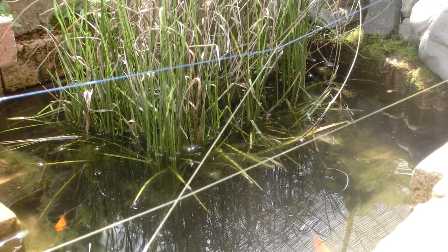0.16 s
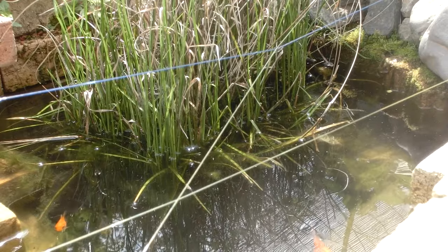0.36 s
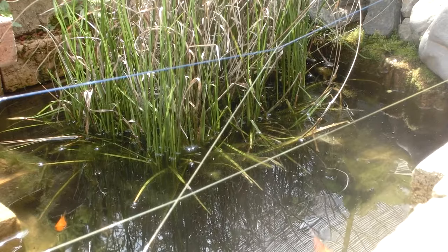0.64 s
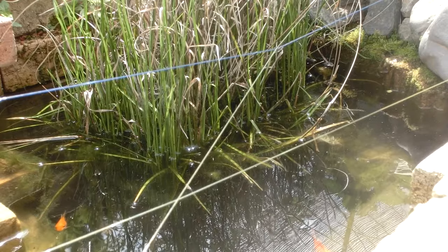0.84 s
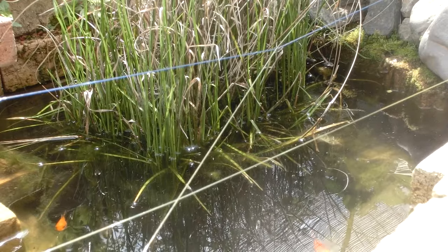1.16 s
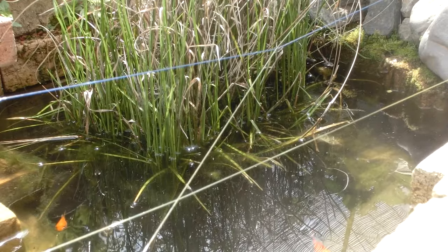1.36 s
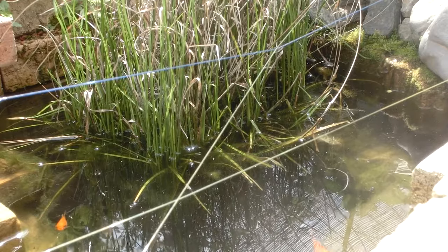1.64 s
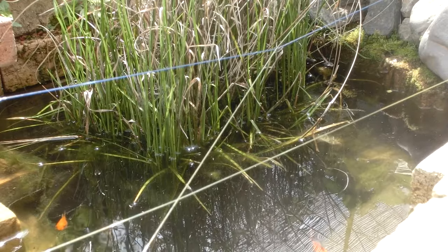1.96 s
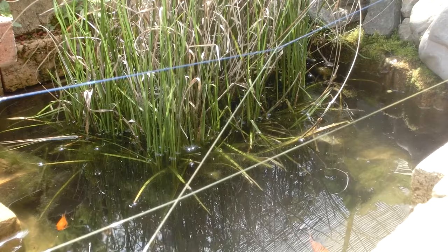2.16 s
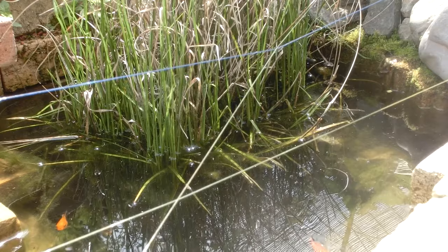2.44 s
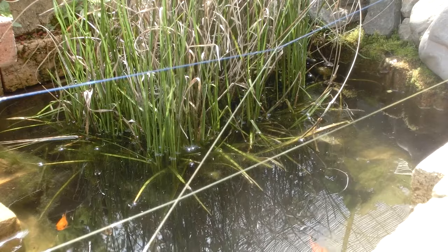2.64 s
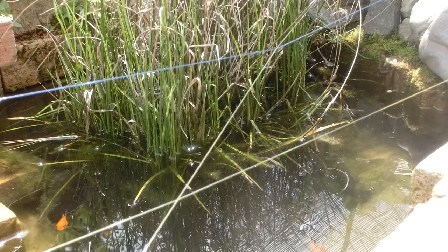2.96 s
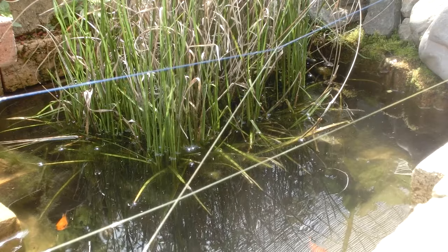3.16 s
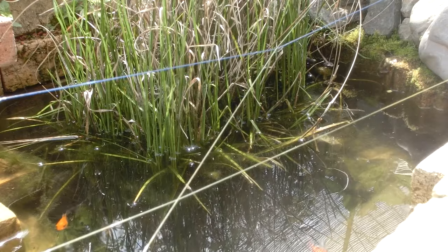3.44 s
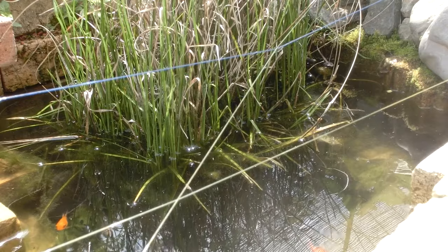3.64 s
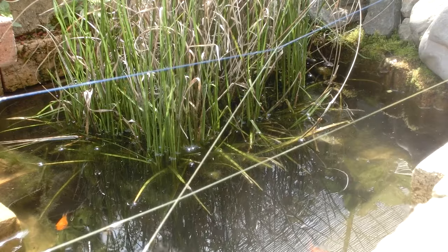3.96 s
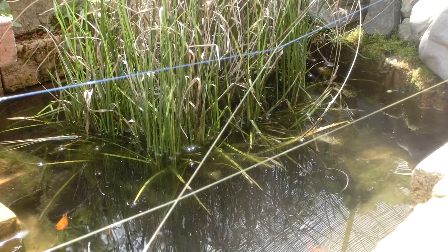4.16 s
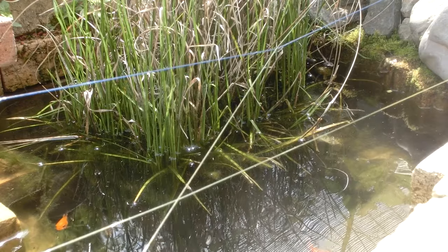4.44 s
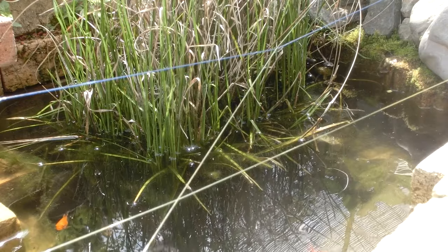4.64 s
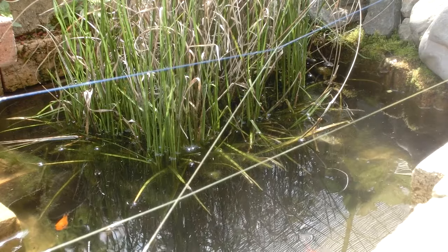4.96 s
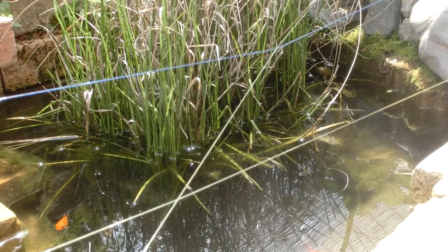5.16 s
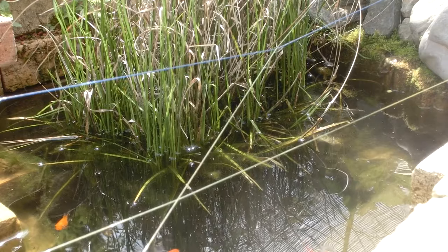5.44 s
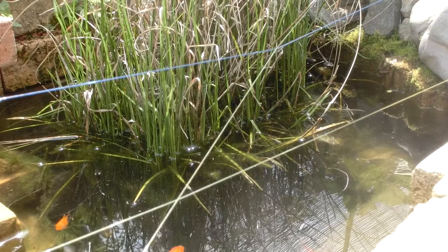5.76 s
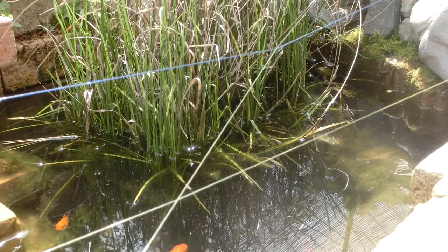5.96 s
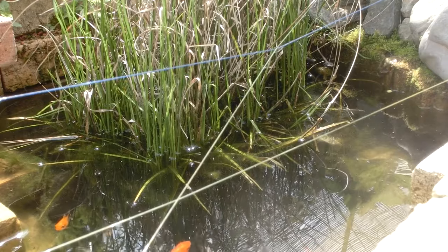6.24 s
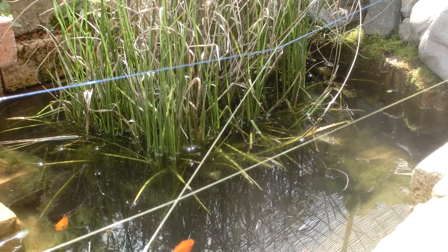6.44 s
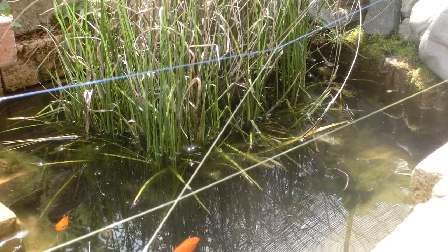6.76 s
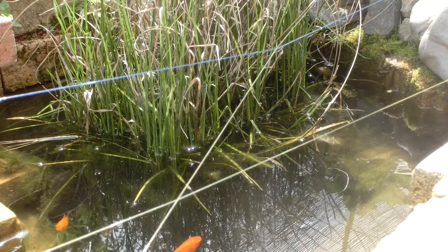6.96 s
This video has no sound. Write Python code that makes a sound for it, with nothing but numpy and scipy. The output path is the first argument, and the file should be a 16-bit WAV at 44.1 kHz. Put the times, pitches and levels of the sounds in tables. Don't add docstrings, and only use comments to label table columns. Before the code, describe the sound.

A frog at a garden pond, a few metres from a stereo microphone pair, croaks seven times. Each croak is a third of a second of rapid hollow clicks, swelling then dropping off. The first two are soft and halting, then after pauses come stronger ones, ending with two loud rolls close together. Beneath lie faint town hum, dull distant traffic bumps and light hiss.

```python
import sys
import numpy as np
from scipy import signal
from scipy.fft import rfft, irfft, next_fast_len
from scipy.io import wavfile
from scipy.ndimage import uniform_filter1d

SR = 44100
rng = np.random.default_rng(int(sys.argv[2]) if len(sys.argv) > 2 else 0)


def convert_level_to_amplitude(level_db):
    exponent = np.asarray(level_db, float) / 20
    return 10 ** exponent


def file_out(sig):
    cols = np.atleast_2d(sig).T
    lim = np.clip(cols, -1, 1)
    pcm = np.round(lim * 32767).astype(np.int16)
    wavfile.write(sys.argv[1], SR, pcm)


N = 313110
LEFT_RIGHT = np.array([[1], [-1]])


def level(x, db):
    return x * convert_level_to_amplitude(db) / np.sqrt(np.mean(x ** 2))


def band_pass(x, low_hz, high_hz):
    return signal.sosfilt(signal.butter(2, [low_hz, high_hz], "band", fs=SR, output="sos"), x)


def walk(rate_hz):
    hold = int(SR / rate_hz)
    steps = np.repeat(rng.standard_normal(N // hold + 1), hold)
    return 1.22 * uniform_filter1d(uniform_filter1d(steps, hold), hold)[:N]


def bands(table, swell_db):
    size = next_fast_len(N)
    octave = np.log2(np.fft.rfftfreq(size, 1 / SR) + 1)
    table_hz, table_db = np.transpose(table)
    noise = rfft(rng.standard_normal(size)) * convert_level_to_amplitude(np.interp(octave, np.log2(table_hz), table_db))
    noise[octave > np.log2(15200)] *= convert_level_to_amplitude(-4)
    noise[(octave > np.log2(15900)) | (octave < 4)] = 0
    out = 0
    for centre in np.arange(4, 14.1, .5):
        centre_hz = 2 ** centre
        window = np.cos(np.pi * np.clip(octave - centre, -.5, .5)) ** 2
        band = irfft(noise * window, size)[:N]
        flicker_db = 1.14 * walk(9) * min(1, 900 / centre_hz)
        out = out + band * convert_level_to_amplitude(swell_db(centre_hz) + flicker_db)
    return out


# pitch_hz [Hz], level_db [dB per Hz]
HUM_SPECTRUM = [(22, -12), (135, -14.5), (270, -4), (660, -3), (1350, -12), (1600, -12), (2390, -19),
                (16000, -28)]
# pitch_hz [Hz], level_db [dB]
HUM_DIFFERENCE = [(60, -4.5), (110, -5), (200, -9), (380, -11), (700, -11.5), (1290, -7.5), (3200, -1.5),
                  (15000, 1.5)]
# time_s [s], level_db [dB]
TOWN_SWELL = [
    (0, 4),
    (1.2, 0.5),
    (2.2, 1),
    (3.4, -0.7),
    (5.45, -2.5),
    (5.9, 1),
    (6.5, -1),
    (7.1, -5),
]


def background():
    hum_db, left_db, drone_share = -54, -1.2, 0.47
    rumble_db = np.interp(np.arange(N) / SR, *np.transpose(TOWN_SWELL))
    side_hz, side_db = np.transpose(HUM_DIFFERENCE)

    def shared_db(hz):
        rumble = rumble_db * (110 < hz < 420)
        return rumble + drone_share * rumble_db * (hz > 420) * min(1, (900 / hz) ** 0.54)

    def different_db(hz):
        return shared_db(hz) + np.interp(np.log(hz), np.log(side_hz), side_db)

    shared = bands(HUM_SPECTRUM, shared_db)
    different = bands(HUM_SPECTRUM, different_db)
    lean = convert_level_to_amplitude(LEFT_RIGHT * left_db / 2)
    return (shared + different * LEFT_RIGHT) * lean * convert_level_to_amplitude(hum_db) / shared.std()


# time_s [s], length_s [s], pitch_hz [Hz], width_hz [Hz], level_db [dB]
TRAFFIC_BUMPS = [
    (0.298, 0.025, 286, 80, -58),
    (.55, 0.11, 326, 90, -58),
    (1.864, 0.024, 306, 100, -52.5),
    (2.255, 0.035, 364, 119, -49.5),
    (2.29, 0.029, 448, 250, -52),
    (2.357, 0.027, 354, 100, -55),
    (4.08, 0.054, 383, 200, -53.5),
    (4.71, 0.051, 272, 80, -57.5),
]


def bumps():
    t, out = np.arange(N) / SR, 0
    for time_s, length_s, hz, width_hz, level_db in TRAFFIC_BUMPS:
        shape = np.exp(-((t - time_s) / length_s) ** 2)
        burst = shape * band_pass(rng.standard_normal(N), hz - width_hz / 2, hz + width_hz / 2)
        out = out + convert_level_to_amplitude(level_db) * burst * np.sqrt(np.sum(shape ** 2) / np.sum(burst ** 2))
    return out


def fading_noise(t60_s, onset, shape=()):
    t = np.arange(SR // 2) / SR
    return rng.standard_normal((*shape, len(t))) * convert_level_to_amplitude(-60 * t / t60_s) * np.clip(onset(t), 0, 1)


# delay_ms [ms], gain [times]
ECHO_PATHS = [(0, -.11), (.099, 1), (1.963, .546), (2.006, -.649), (2.578, .198), (3.402, .13),
              (3.895, -.134), (4.573, -.089), (5.045, .057), (6.1, -.065), (6.374, -.044), (7.276, -.028),
              (8.313, -.047), (10.48, -.02), (11.79, .024), (13.58, -.02), (15.03, .026), (16.27, -.032),
              (18.02, .022), (20.8, -.021), (35.59, .06), (36.55, .058), (37.2, -.035), (43.22, .019)]


def pond(x):
    right_lag_ms, frog_left_db = 0.02, 0.4
    garden_db, garden_side_db, leaves_hz, echo_treble_hz = -12.5, -20, 850, 5000
    stems_db, stems_low_hz = -11.5, 2400
    size = next_fast_len(N + SR)
    hz = np.fft.rfftfreq(size, 1 / SR)
    paths = np.zeros((2, 2, 4096))
    for delay_ms, gain in ECHO_PATHS:
        echo = delay_ms > 1
        right_db = 1 if echo else 1.5
        pulse = np.sinc(np.arange(4096) - 32 - delay_ms * SR / 1000)
        paths[int(echo)] += gain * convert_level_to_amplitude(-LEFT_RIGHT * right_db / 2) * pulse
    direct, echoed = rfft(paths, size)
    near = direct + echoed / (1 + (hz / echo_treble_hz) ** 6)
    lag = np.exp(-2j * np.pi * hz * np.array([[0], [right_lag_ms / 1000]]))
    both = convert_level_to_amplitude(LEFT_RIGHT * frog_left_db / 2) * lag * near

    mid, side = fading_noise(0.36, lambda t: t / 0.0015, (2,))
    spread_db = 10 * np.log10(len(mid))
    tail = level(mid + convert_level_to_amplitude(garden_side_db) * side * LEFT_RIGHT, garden_db - spread_db)
    both = both + rfft(tail, size) / (1 + 1j * hz / leaves_hz)

    stems = level(fading_noise(0.035, lambda t: t / 0.002 - 1), stems_db - spread_db)
    rise = 1j * hz / stems_low_hz
    both = both + rfft(stems, size) * (rise / (1 + rise)) ** 2
    return irfft(rfft(x, size) * both, size)[:, 36:N + 36]


# start_s [s], clicks [count], period_ms [ms], wait_ms after the first click [ms],
# slowing_ms [ms per click squared]
CROAK_RHYTHM = [
    (.0563, 13, 18.04, 8.16, .093),
    (.5109, 15, 20, -8, 0),
    (1.4835, 15, 18.97, 6.27, .009),
    (2.9127, 16, 18.42, 6.78, .021),
    (3.7288, 17, 18.01, 10.5, .044),
    (5.6075, 18, 17.83, 10.03, .034),
    (6.175, 20, 17.85, 6.79, .045),
]
# croak [number],
# click [number], delay_ms [ms]
CORD_CATCHES = [(0, 9, .2), (0, 10, 1.7), (0, 11, 3.3), (1, 6, 2.5), (1, 7, -1.9), (1, 8, 14.4),
                (1, 9, 5.2), (1, 10, -2), (1, 12, 10), (1, 13, 7.5), (1, 14, 2.1), (2, 13, 15.6),
                (2, 14, 7.5), (4, 4, 16.2), (4, 5, 2.2), (4, 6, 4), (4, 7, -4.6), (4, 15, 1), (4, 16, -1),
                (5, 5, .4), (5, 11, -1.1), (5, 15, .9), (6, 7, .5), (6, 12, -.5), (6, 19, 2.2)]


def click_times_ms(croak, slack):
    _, count, period_ms, wait_ms, slowing_ms = CROAK_RHYTHM[croak]
    k = np.arange(count)
    caught_ms = sum(delay * (k >= click) for which, click, delay in CORD_CATCHES if which == croak)
    return period_ms * k + wait_ms * (k > 0) + slowing_ms * k ** 2 + 1.6 * slack + caught_ms


SLACK_CLICKS = [
    (9, 11),
    (1, 3, 5, 6, 9, 11, 12),
    (4, 6, 8, 9, 11, 13),
    (3, 6, 8, 13),
    (6, 8, 10),
    (4, 5, 7, 13),
    (3, 5, 7, 9),
]
TAUT_CLICKS = [
    (10,),
    (7, 10, 13),
    (5, 10),
    (5, 9, 12),
    (3, 4, 9, 14),
    (6, 11),
    (4, 11, 14),
]
# half_swollen_s [s], swell_ms [ms], peak_db [dB], last_click_drop_db [dB],
# sac_stretch [%]
CROAK_EFFORT = [
    (.234, 30, -15.5, 3, 7.9),
    (.732, 72, -14.5, 2.5, 2.3),
    (1.591, 23.5, -12.5, 8, 7.1),
    (3.011, 22.5, -10.5, 3.5, 9.3),
    (3.854, 31.6, -8.5, 5.5, 8.2),
    (5.721, 26, -8, 5, 7.4),
    (6.27, 22.4, -8.5, 7, 4.8),
]
# last_pitch_hz [Hz], top_ring_sinks_s [s], overtone_db [dB], treble_db [dB]
CROAK_COLOUR = [(1480, .4, 3, -1), (1440, .9, 2, -0.5), (1440, 1.8, 2.5, -1), (1570, 3.17, 2.7, -.5),
                (1470, 3.952, 2.5, 1.9), (1530, 5.74, 3, 0.1), (1480, 6.32, 2.5, 2)]


def clicks():
    first_db, usual_gap_ms = -35.5, 18.1
    rest_hz, empty_hz, emptying_s = 1785, 1708, 0.12
    weak_overtone_db, weak_treble_db = 6.5, -5.5
    top_high_hz, top_low_hz = 9970, 9020
    rows = []
    for croak, (start_s, count, *_) in enumerate(CROAK_RHYTHM):
        half_s, swell_ms, peak_db, drop_db, stretch = CROAK_EFFORT[croak]
        last_hz, sinks_s, croak_over_db, croak_treble_db = CROAK_COLOUR[croak]
        k = np.arange(count)
        slack, taut = np.isin(k, SLACK_CLICKS[croak]), np.isin(k, TAUT_CLICKS[croak])
        last = k == count - 1
        ms = click_times_ms(croak, slack)
        s = start_s + ms / 1000
        left_s = s[-1] - s
        effort = 1 / (1 + np.exp((half_s - s) * 1000 / swell_ms))
        full = np.minimum(left_s / emptying_s, 1)

        gap_ms = np.diff(ms, append=ms[-1] + usual_gap_ms)
        hurry = np.clip(usual_gap_ms - gap_ms, -3, 6) * (k > 0)
        tired_db = np.where(last, drop_db, 7.5 * np.exp(-left_s * 1000 / 25))
        db = peak_db + 20 * np.log10(effort + 0.029) - tired_db
        reserve_db = np.minimum(-3 - db, 11.5)
        db = db + reserve_db * (0.12 * taut - 0.16 * slack - 0.051 * hurry)
        db[0] = first_db

        filled = np.sqrt(effort)
        hz = (1 - filled) * rest_hz + filled * empty_hz * (1 + stretch / 100 * full)
        hz = hz + 25 * slack - 14 * taut
        hz = hz - 110 * slack * (k == count - 2)
        hz = np.where(last, last_hz, hz)

        over_db = croak_over_db - 3 * taut + weak_overtone_db - 19 * convert_level_to_amplitude(db)
        over_db = over_db + effort * (2 * slack + 0.17 * hurry - 5 * (1 - full))
        over_db = np.where(last, 6, over_db)
        treble_db = croak_treble_db + (1 - effort) * weak_treble_db
        treble_db = treble_db + effort * (full - 4 * (1 - full) - slack)
        top_hz = top_low_hz + (top_high_hz - top_low_hz) / (1 + np.exp((s - sinks_s) * 1000 / 12))
        rows.append([s, db, hz, over_db, treble_db, top_hz])
    false_start = [6.1675, -34.5, rest_hz, weak_overtone_db, weak_treble_db, top_high_hz]
    rows.append(np.transpose([false_start]))
    return np.concatenate(rows, axis=1)[:, :, None]


def ring(ms, hz, decay_ms):
    u = ms / decay_ms
    return u ** 2.344 * np.exp(-u) * np.sin(2 * np.pi * hz * ms / 1000)


# pitch_hz [Hz], decay_ms [ms], gain against the sac [times]
THROAT_OVERTONES = [(3110, .89, -.043), (3259, .145, -.158)]


def voice(ms, hz, over_db):
    sac = ring(ms, hz, .266 * np.minimum(1803 / hz, 1.05))
    snap = .342 * ring(ms, 2280, .081)
    highest = (3580, 0.21, -0.024)
    throat = sum(gain * ring(ms, f, decay_ms) for f, decay_ms, gain in [*THROAT_OVERTONES, highest])
    return sac + snap + convert_level_to_amplitude(over_db - 1) * throat


# pitch_hz [Hz], decay_ms [ms], level_db [dB]
CARTILAGE_RINGS = [(5300, 0.16, 8), (5670, 0.3, -0.5), (6670, 0.78, -7)]


def tinkle(ms, top_hz):
    def chance():
        return rng.standard_normal((len(ms), 1))

    out = convert_level_to_amplitude(0.5 + 1.4 * chance()) * ring(ms, top_hz, 0.54)
    for hz, decay_ms, level_db in CARTILAGE_RINGS:
        out = out + convert_level_to_amplitude(level_db + 2.2 * chance()) * ring(ms, hz * (1 + 0.036 * chance()), decay_ms)
    return out


def rustle(ms):
    noise = band_pass(rng.standard_normal(ms.shape), 4500, 13600)
    return noise * (1 - np.exp(-ms / 0.29)) * np.exp(-ms / 3.06)


def lay(times, sounds):
    out = np.zeros(N + sounds.shape[1])
    np.add.at(out, (times * SR).astype(int)[:, None] + np.arange(sounds.shape[1]), sounds)
    return out[:N]


def frog():
    s, db, hz, over_db, treble_db, top_hz = clicks()
    ms = np.maximum(np.arange(512) / SR - s % (1 / SR), 0) * 1000
    treble = convert_level_to_amplitude(treble_db) * (convert_level_to_amplitude(-35.5) * tinkle(ms, top_hz) + convert_level_to_amplitude(-33.5) * rustle(ms))
    croaks = lay(s[:, 0], convert_level_to_amplitude(db + 1.77) * (voice(ms, hz, over_db) + treble))
    return signal.sosfilt(signal.butter(4, 660, "high", fs=SR, output="sos"), croaks)


def scene():
    return background() + bumps() + pond(frog())


def roll_off(x):
    return signal.sosfilt(signal.butter(12, 16470, fs=SR, output="sos"), x)


def record(dry):
    heard = dry - 0.097 * band_pass(dry ** 2, 40, 200)
    heard = signal.sosfilt(signal.ellip(8, .2, 50, 15780, fs=SR, output="sos"), heard)
    return roll_off(heard)


dry = scene()
out = record(dry)
file_out(out)
```